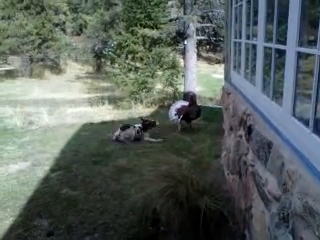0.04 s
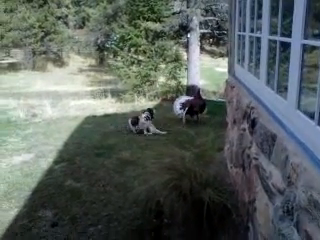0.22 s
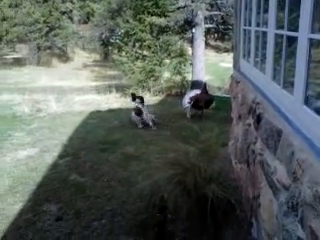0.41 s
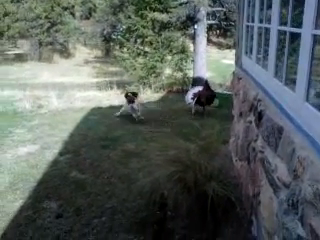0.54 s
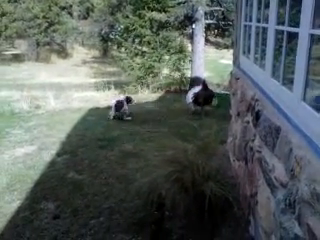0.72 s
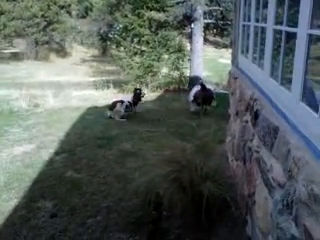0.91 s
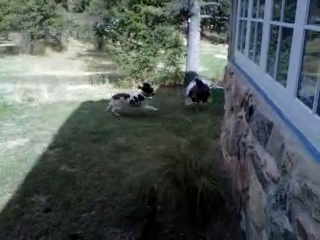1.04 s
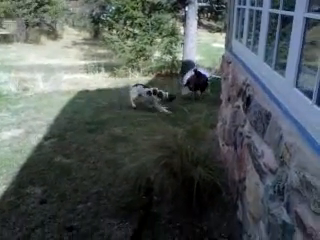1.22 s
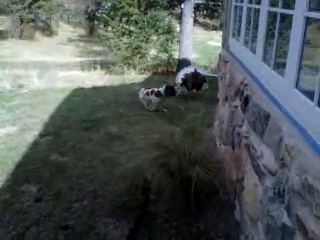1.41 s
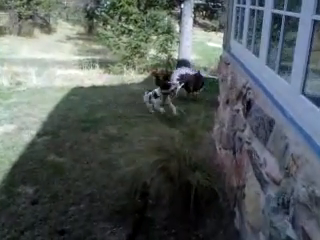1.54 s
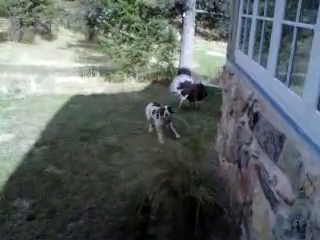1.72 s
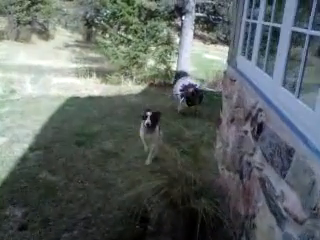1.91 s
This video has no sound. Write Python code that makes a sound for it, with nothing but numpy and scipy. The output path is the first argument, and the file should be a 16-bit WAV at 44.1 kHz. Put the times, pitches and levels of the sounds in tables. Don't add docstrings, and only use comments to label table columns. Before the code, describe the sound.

Single rising hoarse dog bark, then turkey whine and clear yelp, later clusters of quick piping notes with grunts, breathy feather hiss and grass scuffs; quiet open yard, slight wall echo, limited-band camera microphone.

```python
import sys
import numpy as np
from scipy import signal
from scipy.io import wavfile
from scipy.ndimage import uniform_filter1d

SR = 44100
rng = np.random.default_rng(int(sys.argv[2]) if len(sys.argv) > 2 else 0)


def to_wav(sig):
    pcm = np.clip(np.atleast_2d(sig), -1, 1) * 32767
    pcm = np.round(pcm).astype(np.int16)
    wavfile.write(sys.argv[1], SR, pcm.T)


def attenuation_scalar(level_db):
    decades = np.asarray(level_db, float) / 20
    return 10 ** decades


N = 85995
CUTOFF_HZ = 7450


def rms_one(x):
    return x / np.sqrt(np.mean(x ** 2) + 1e-20)


def at_hz(points, hz):
    p = np.array(points)
    return np.interp(np.log(hz), np.log(p[:, 0]), p[:, 1])


def on_curve(rows):
    return attenuation_scalar(np.interp(np.arange(N) / SR, *np.transpose(rows)))


def wobble(rate_hz, size):
    r = np.exp(-2 * np.pi * rate_hz / SR)
    noise = rng.standard_normal(size + 4000)
    return rms_one(signal.lfilter([1], [1, -2 * r, r * r], noise)[4000:])


def swell(length_s, attack_s, release_s):
    t = np.arange(int(length_s * SR)) / SR
    ramp = np.minimum(t / attack_s, (length_s - t) / release_s)
    return np.sin(np.pi / 2 * np.clip(ramp, 0, 1)) ** 2


def add(out, start_s, x):
    i = int(start_s * SR)
    out[i:i + len(x)] += x[:N - i]


def dog():
    # (time [s], pitch [Hz], level [dB])
    bark = [(.186, 170, -46), (.202, 248.4, -31.5), (.212, 284, -25), (.22, 311.6, -19), (.24, 373, -18),
            (.262, 385.3, -15), (.28, 411.2, -16.5), (.312, 402.3, -18), (.332, 415, -30.5)]
    grunt_a = [(.8, 110.4, -55.5), (.83, 127.1, -40.5), (.845, 146.2, -32.5), (.865, 154.8, -30.5),
               (.885, 146.2, -32), (.9, 117.5, -41.5), (.912, 114, -40.5)]
    grunt_b = [(1.435, 248, -57), (1.447, 231.3, -22.5), (1.46, 241, -30.5), (1.478, 242.8, -22),
               (1.49, 250.2, -27), (1.5, 236, -43), (1.525, 241, -50), (1.545, 239, -68)]
    grunt_c = [(.915, 135, -34), (.927, 134, -39), (.945, 130, -46.5), (.965, 128, -51), (.985, 120, -66)]
    grunt_d = [(1.395, 125, -45.5), (1.41, 128, -44.5), (1.428, 131.7, -37.5), (1.44, 135, -31.5)]
    # (frequency [Hz], level [dB])
    bark_throat = [(200, -13), (420, -10), (650, -1), (800, 1.5), (1050, 7.5), (1400, -6.5), (2100, 0.5),
                   (3100, -19.5)]
    bark_end_throat = [(200, -6), (420, 1.5), (600, -4), (820, 3), (1150, -9.5), (1650, -2.5), (2300, -12),
                       (3100, -30)]
    low_throat = [(140, -8), (290, 2.5), (420, -15.5), (560, -9.5), (800, -21.5), (1100, -22.5),
                  (2500, -23.5)]
    high_throat = [(120, -6), (235, -4), (500, 1.5), (720, -11.5), (1000, -23), (1250, -22), (1600, -30),
                   (3000, -26)]
    # (start [s], length [s], level [dB], centre [Hz])
    rasps = [
        (.328, 0.083, -44, 1100),
        (.315, 0.038, -36.5, 270),
        (.34, 0.092, -48, 396),
        (.775, 0.056, -46, 750),
        (.845, 0.035, -41, 600),
        (1.44, 0.019, -44, 600),
        (1.49, 0.093, -52.5, 600),
    ]
    return (call(bark, bark_throat, jitter=0.012, breath=0.21, half_db=-14.5,
                 end_throat=bark_end_throat, dull_per_db=0.9)
            + call(grunt_a, low_throat, jitter=0.035, breath=0.18, half_db=-14, count=20)
            + call(grunt_c, low_throat, jitter=0.025, breath=0.47, half_db=-14.5, dull_per_db=1.0, count=8)
            + call(grunt_d, low_throat, jitter=0.03, breath=0.2, half_db=-18, count=12)
            + call(grunt_b, high_throat, jitter=0.025, breath=0.2, half_db=-14, count=20)
            + bursts(rasps, octaves=0.71, attack_s=0.018))


def turkey():
    # (time [s], pitch [Hz], level [dB])
    whine_start = [(.385, 792, -47), (.415, 837, -36.5), (.432, 812, -33), (.443, 770, -54.5),
                   (.455, 770, -30.5), (.48, 753, -36.5), (.503, 761, -27), (.517, 715, -36.5)]
    whine_rise = [(.517, 739, -36.5), (.535, 770.5, -20), (.54, 766, -39), (.548, 803, -18),
                  (.562, 779, -23.5), (.568, 870, -19), (.577, 878, -27.5), (.59, 954, -25.5),
                  (.605, 974, -30.5)]
    yelp = [(.592, 630, -47), (.606, 636.6, -31), (.613, 667.6, -18), (.628, 670.5, -16),
            (.65, 676.8, -23.5), (.668, 669, -22), (.682, 728, -33), (.695, 665, -46)]
    # (start [s], length [s], first pitch
    # [Hz], last pitch [Hz], level [dB])
    fluty = [(0.058, 0.041, 1050, 964, -51), (0.299, 0.034, 519, 490.5, -18),
             (0.724, 0.065, 1249, 1366, -30.5), (0.769, 0.043, 1364, 1218, -33.5),
             (.952, 0.018, 692, 667, -36.5), (.955, .025, 1210, 1297, -35.5),
             (1.0, 0.045, 1067, 1116, -27.5), (1.005, 0.021, 964, 894, -36),
             (1.062, 0.035, 1309, 1373, -32.5), (1.098, 0.028, 1262, 1250, -21.5),
             (1.114, 0.041, 1292, 1209, -30), (1.132, 0.017, 1034, 1060, -39),
             (1.161, 0.019, 1690, 1506, -36), (1.15, 0.038, 842, 596, -45.5),
             (1.311, 0.0249, 595, 602, -32), (1.32, 0.018, 1010, 1100, -39.5),
             (1.336, 0.0353, 1472, 1170, -28.5), (1.361, 0.038, 1141, 1088, -33),
             (1.403, 0.024, 1270, 1183, -25), (1.421, 0.023, 1110, 1075, -31.5),
             (1.44, 0.031, 1059, 1070, -34), (1.881, 0.05, 1212, 1106, -35.5)]
    reedy = [
        (.66, 0.071, 1059, 945, -26.5),
        (.94, 0.037, 899.6, 962, -28),
        (.966, 0.043, 823, 933.5, -26),
        (1.042, 0.0191, 953, 940, -24.5),
        (1.058, 0.026, 968, 935, -30),
    ]
    # (frequency [Hz], level [dB])
    whine_throat = [(750, -7.5), (950, 6.5), (1550, 3.5), (1900, 0), (2400, -15.5), (3200, -35),
                    (4800, -22), (7000, -66.5)]
    yelp_throat = [(670, -6), (1200, 7), (1400, 7), (1700, -31.5), (2200, -3), (3500, -12), (5000, -7),
                   (7000, -30.5)]
    fluty_throat = [(500, 2), (1350, 0.5), (1950, -11), (2800, -4), (5000, -1.5), (7000, -30)]
    reedy_throat = [(900, 2), (1900, -9), (2900, -9.5), (3800, -10), (4800, -25.5), (7000, -44)]
    return (call(whine_start, whine_throat, jitter=0.012, breath=0.4, half_db=-36.0,
                 dull_per_db=1.03, count=16)
            + call(whine_rise, whine_throat, jitter=0.008, breath=0.08, half_db=-27, count=16)
            + call(yelp, yelp_throat, jitter=0.002, breath=0.15, half_db=-30.5, opening=0.82, count=22)
            + notes(fluty, fluty_throat, jitter=0.012, breath=0.18, half_db=-20, tilt_db=-11)
            + notes(reedy, reedy_throat, jitter=0.012, breath=0.2, half_db=-28))


def call(rows, throat, dull_per_db=0.0, **kind):
    s, hz, db = np.transpose(rows)
    t = np.arange(s[0], s[-1], 1 / SR)
    effort_db = np.interp(t, s, db)
    tilt_db = dull_per_db * (effort_db - db.max())
    sound = voice(np.interp(t, s, hz), throat, size=12000, tilt_db=tilt_db, **kind)
    shape = np.resize(swell(s[-1] - s[0], 0.0051, 0.00039), len(t))
    out = np.zeros(N)
    add(out, s[0], sound * attenuation_scalar(effort_db) * shape)
    return out


def notes(rows, throat, **kind):
    attack_share, release_share, bend = 0.24, 0.16, 0.7
    out = np.zeros(N)
    for s, length, hz0, hz1, db in rows:
        shape = swell(length, attack_share * length, release_share * length)
        hz = hz0 + (hz1 - hz0) * np.linspace(0, 1, len(shape)) ** bend
        add(out, s - 0.003, attenuation_scalar(db) * shape * voice(hz, throat, count=14, size=4000, **kind))
    return out


def voice(hz, throat, jitter, breath, half_db, size, opening=1, tilt_db=0, count=31, end_throat=None):
    n, end_throat = len(hz), end_throat or throat
    done = np.linspace(0, 1, n)
    hz = hz * (1 + jitter * wobble(88, size)[:n])
    phase = np.cumsum(hz) * 2 * np.pi / SR
    out, power = 0, 0
    for k in np.arange(2, count) / 2:
        seen_hz = k * hz / opening ** done
        throat_db = (1 - done) * at_hz(throat, seen_hz) + done * at_hz(end_throat, seen_hz)
        uneven_db = half_db if k % 1 else 0
        gain = attenuation_scalar(throat_db + uneven_db + tilt_db * np.log2(k)) * (k * hz < CUTOFF_HZ)
        rough = breath * np.sqrt(k)
        skirt = rough * (wobble(63, size) + 1j * wobble(36, size) + 0.84 * wobble(170, size))[:n]
        turn = np.exp(1j * (k * phase + rng.uniform(0, 2 * np.pi)))
        out = out + gain * np.real((1 + skirt) * turn)
        power = power + gain ** 2 * (0.5 + rough ** 2)
    floor = signal.butter(4, 0.6 * hz.min(), "high", fs=SR, output="sos")
    return signal.sosfilt(floor, out / np.sqrt(power + 1e-12))


def bursts(rows, octaves, attack_s):
    out = np.zeros(N)
    for s, length, db, hz in rows:
        edges_hz = [hz / 2 ** octaves, min(hz * 2 ** octaves, 9000)]
        band = signal.butter(2, edges_hz, "band", fs=SR, output="sos")
        shape = swell(length, attack_s, length / 2)
        puff = rms_one(signal.sosfilt(band, rng.standard_normal(12000))[4000:])
        add(out, s, attenuation_scalar(db) * shape * puff[:len(shape)])
    return out


def breath_and_feathers():
    # (time [s], level [dB])
    level = [(.74, -76), (.79, -31.5), (.815, -76), (.93, -59), (.95, -34.5), (1.02, -52.5), (1.05, -40),
             (1.08, -32), (1.12, -34), (1.2, -40.5), (1.37, -39), (1.42, -45.5), (1.53, -44), (1.95, -88)]
    # (frequency [Hz], width [Hz], level [dB])
    resonances = [(1250, 840, -9), (1964, 110, -12), (2922, 700, -0.5), (5000, 530, -16),
                  (7200, 1600, -22.5)]
    out = 0
    for hz, width_hz, db in resonances:
        r = np.exp(-np.pi * width_hz / SR)
        a = [1, -2 * r * np.cos(2 * np.pi * hz / SR), r * r]
        once = signal.lfilter([1, 0, -1], a, rng.standard_normal(N))
        band = signal.lfilter([1, 0, -1], a, once)
        out = out + attenuation_scalar(db + 2.3 * wobble(60, N)) * rms_one(band)
    return on_curve(level) * out


def grass():
    # (time [s], level [dB])
    level = [(0, -66), (.3, -63), (.34, -54.5), (.8, -47), (.85, -62.5), (1.0, -63), (1.5, -45),
             (1.62, -50), (1.95, -49.5)]
    # (frequency [Hz], level [dB])
    colour = [(300, -35.5), (700, -12), (1650, 2), (2200, -6.5), (3150, 3), (7300, -2)]
    # (start [s], length [s], level [dB], centre [Hz])
    scuffs = [
        (.195, 0.033, -45, 3050),
        (1.075, 0.045, -29.5, 2530),
        (1.06, 0.099, -55, 5160),
        (1.3, 0.014, -60, 1180),
        (1.52, 0.015, -43.5, 4440),
        (1.704, 0.021, -46, 2540),
        (1.716, 0.035, -37.5, 4100),
    ]
    rustle = on_curve(level) * patchy_noise(colour, patchy_db=2.5)
    return rustle + bursts(scuffs, octaves=0.4, attack_s=0.0012)


def patchy_noise(colour, patchy_db):
    edges = 22 * 2 ** np.arange(0, 8.5, 1 / 3)
    white = rng.standard_normal((2, N))
    out = 0
    for k, (low, high) in enumerate(zip(edges, edges[1:])):
        band_pass = signal.butter(2, [low, high], "band", fs=SR, output="sos")
        band = signal.sosfilt(band_pass, white[k % 2])
        out = out + band * attenuation_scalar(at_hz(colour, np.sqrt(low * high)) + patchy_db * wobble(10.9, N))
    return rms_one(out)


def wall(x):
    echo_s, echo_db, tail_db, tail_t60_s = 0.009, -18, -25, 0.16
    t = np.arange(SR // 4) / SR
    tail = rng.standard_normal(len(t)) * attenuation_scalar(-60 * t / tail_t60_s) * (t > 2 * echo_s)
    tail = attenuation_scalar(tail_db) * tail / np.sqrt(np.sum(tail ** 2))
    tail[int(echo_s * SR)] = attenuation_scalar(echo_db)
    return signal.fftconvolve(x, tail)[:N]


def yard():
    # (frequency [Hz], level [dB])
    colour = [(25, 9.5), (180, -2), (640, -3.5), (1500, -16.5), (7300, -14)]
    return attenuation_scalar(-63.5) * patchy_noise(colour, patchy_db=4.0)


def wind():
    # (start [s], length [s], level [dB], centre [Hz])
    bumps = [
        (.4, 0.13, -61.5, 65),
        (1.3, 0.071, -50, 66.7),
    ]
    return bursts(bumps, octaves=0.44, attack_s=0.041)


def scene():
    animals = dog() + turkey()
    return (animals + wall(animals) + breath_and_feathers() + grass() + yard() + wind())[None]


def masking(x):
    mask_db, mask_top_db = -43, 6
    _, _, z = signal.stft(x, nperseg=1024, window="cosine")
    power = uniform_filter1d(abs(z) ** 2, size=5, axis=1)[:, 2::5]
    top_db = mask_top_db * (np.arange(power.shape[1]) >= 16)[:, None]
    chance_db = (8 + top_db) * rng.standard_normal(power.shape)
    keep = power > power.max(axis=1, keepdims=True) * attenuation_scalar(2 * (mask_db + top_db) + chance_db)
    keep = np.repeat(keep, 5, axis=1)[:, :z.shape[1]]
    keep[:, :3] = True
    return signal.istft(z * keep, nperseg=1024, window="cosine")[1][:, :N]


def band_limit(x):
    return signal.sosfilt(signal.butter(12, 7990, fs=SR, output="sos"), x)


def record(dry):
    edge_hz, top_db = 3115, -7.5
    dry = signal.sosfilt(signal.butter(1, 60, "high", fs=SR, output="sos"), dry)
    low = signal.sosfilt(signal.butter(8, edge_hz, fs=SR, output="sos"), dry)
    high = signal.sosfilt(signal.butter(8, 1.254 * edge_hz, "high", fs=SR, output="sos"), dry)
    top_cut = signal.cheby2(16, 50, CUTOFF_HZ, fs=SR, output="sos")
    mix = masking(signal.sosfilt(top_cut, low + attenuation_scalar(top_db) * high))
    return band_limit(mix)


dry = scene()
out = record(dry)
to_wav(out)
```